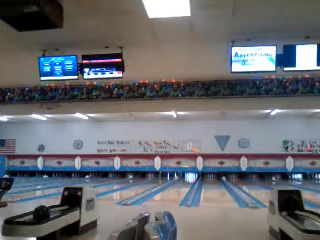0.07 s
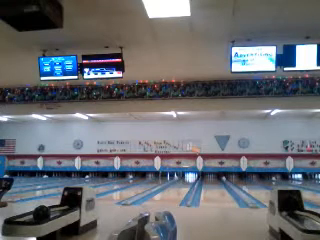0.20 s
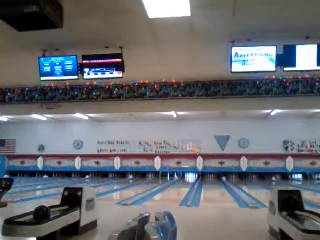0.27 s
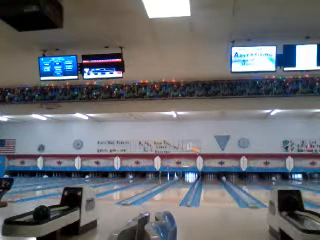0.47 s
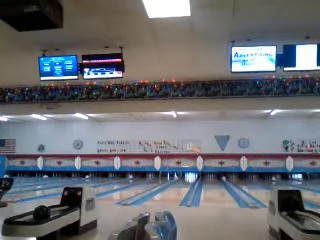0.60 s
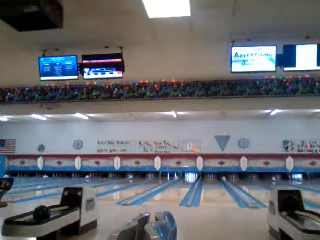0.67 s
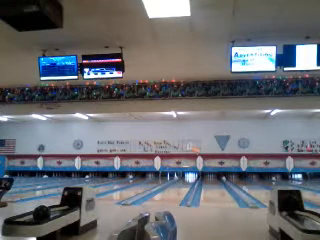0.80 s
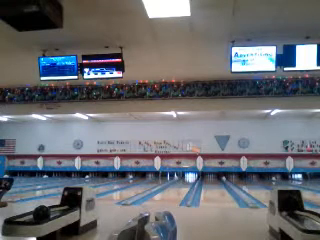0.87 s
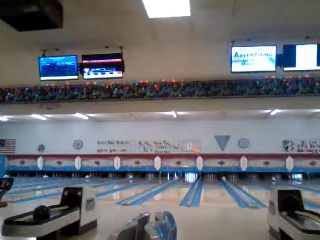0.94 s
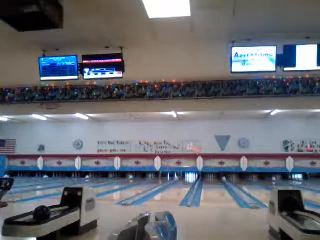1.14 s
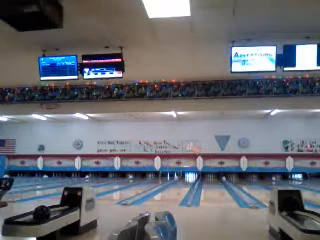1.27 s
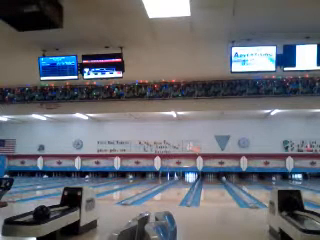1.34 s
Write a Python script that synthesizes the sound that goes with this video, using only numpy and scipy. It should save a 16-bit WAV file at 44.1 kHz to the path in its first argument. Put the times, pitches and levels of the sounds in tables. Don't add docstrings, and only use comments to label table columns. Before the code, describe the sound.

A loud bowling strike cracks out, then pins clack, knock and thud down in a hall

```python
import sys
import numpy as np
from scipy import signal
from scipy.fft import rfft, irfft, next_fast_len
from scipy.io import wavfile
from scipy.ndimage import uniform_filter1d, minimum_filter1d, map_coordinates

SR = 44100
rng = np.random.default_rng(int(sys.argv[2]) if len(sys.argv) > 2 else 0)


def store_pcm(level_fs):
    pcm = np.round(np.clip(level_fs, -1, 1) * 32767).astype(np.int16)
    wavfile.write(sys.argv[1], SR, np.atleast_2d(pcm).T)


def voltage_ratio(decibels):
    exponent = np.asarray(decibels, float) / 20
    return 10 ** exponent


N = 63945

# f/Hz, level/dB
BAND = [(5, -39), (60, -2), (3300, -1.5), (3900, -12.5), (4300, -18.5), (4800, -70), (7000, -120)]


def unit(x):
    return x / np.sqrt(np.mean(x ** 2) + 1e-20)


def along(points, hz):
    f, v = np.transpose(points)
    return np.interp(np.log(hz + 1), np.log(f + 1), v)


def filtered(x, response):
    m = next_fast_len(N + SR // 2)
    hz = np.fft.rfftfreq(m, 1 / SR)
    return irfft(rfft(x, m) * response(hz), m)[..., :N]


def causal(points):
    def response(hz):
        cepstrum = irfft(np.log(voltage_ratio(along(points, hz))))
        cepstrum[1:len(hz) - 1] *= 2
        cepstrum[len(hz):] = 0
        return np.exp(rfft(cepstrum))
    return response


def wobble(rate):
    knots = rng.standard_normal(int(N * rate / SR) + 4)
    return map_coordinates(knots, [np.arange(N) * rate / SR])


def burst(hz, life_s):
    t = np.arange(SR // 10) / SR
    swell = np.e * t / life_s * np.exp(-t / life_s)
    return swell * np.sin(2 * np.pi * hz * t)


def rush():
    # f/Hz, level/dB per Hz
    rush_colour = [(15, -61), (25, -20), (147, -16), (384, 5), (1070, -7.5), (1140, -10.5), (1520, -14.5),
                   (1990, -17.5), (3650, -30.5), (4740, -64.5), (8030, -120)]
    rush_db = -37
    z = signal.stft(rng.standard_normal(N + SR // 4), nperseg=512)[2]
    patches = uniform_filter1d(rng.standard_normal(z.shape), 4, 0)
    patches = uniform_filter1d(patches, 6, 1)
    noise = signal.istft(z * voltage_ratio(2 * unit(patches)), nperseg=512)[1][:N]

    def colour(hz):
        return voltage_ratio(along(rush_colour, hz) - np.maximum(along(BAND, hz), -12))
    return voltage_ratio(rush_db) * unit(filtered(noise, colour))


def knocks():
    # t/s, peak level/dB, f/Hz, life/cycles
    wood_knocks = [(0.101, -28.5, 384.6, 0.69), (0.223, 2, 658, 0.91), (0.23, -13.5, 730, 1.7),
                   (0.275, -9.5, 783, 1.3), (0.284, -8.5, 691, 1.9), (0.313, -7, 735, 1.1),
                   (0.337, -12.5, 618.5, 0.86), (0.388, -18, 370, 1.3), (0.406, -3.5, 657, 1.5),
                   (0.442, -25.5, 622, 2.8), (0.474, -14, 303.6, 1), (0.545, -14.5, 417, 2.7),
                   (0.606, -18.5, 332, 1.8), (0.632, -28.5, 415, 0.81), (0.653, -14.5, 500, 2.4),
                   (0.675, -13.5, 519, 1.1), (0.715, -14.5, 680, 1), (0.756, -18.5, 349, 1.33),
                   (0.795, -16.5, 379, 1.1), (0.842, -10.5, 388, 1.14), (0.914, -12.5, 381, 0.78),
                   (0.96, -12.5, 516, 0.79), (0.974, -17, 540, 2.3), (1.011, -23, 740, 1.4),
                   (1.036, -35, 428, 1.3), (1.061, -20.5, 504, 1.7), (1.084, -22, 258.7, 1.5),
                   (1.116, -25, 242.6, 1.5), (1.15, -14, 633, 1.37)]
    # t/s, peak level/dB, f/Hz, life/cycles
    more_knocks = [
        (.2313, -10, 710, 0.92),
        (.330, -17.5, 373.5, 2.64),
        (.4078, -8, 457.5, 1.15),
        (.420, -16, 486, 1.8),
        (.464, -14.5, 561, 2.8),
        (.484, -21, 289.6, 2.4),
        (.925, -18, 633, 1.2),
        (.945, -19.5, 505, 2.1),
        (.985, -20, 620, 1.1),
        (1.158, -17.5, 706, 1.83),
    ]
    # t/s, peak level/dB, f/Hz
    pings = [
        (0.2537, -20, 1490),
        (0.3137, -24, 1584),
        (0.4674, -19.5, 1430),
        (0.5208, -31, 1750),
        (0.6794, -29, 1650),
        (0.6933, -30.5, 1828),
        (0.705, -31.5, 1904),
        (0.7597, -33, 2110),
        (1.0494, -48.5, 1606),
    ]
    # f/Hz, level/dB
    crack_colour = [(300, -10.5), (1500, 7.5), (2300, -3.5), (2800, -13.5), (3400, -3), (4200, -6)]
    knock_db, lag_s = -0.5, 0.0001
    under, under_db = 0.686, -9
    crack_db, crack_s, crack_grows = -18.5, 0.009, 1.2
    lead_s, lead_db = 0.0029, -24.5
    ping_db, ping_s = -1.5, 0.0016

    x, cracks = np.zeros(N + SR), np.zeros(N + SR)
    t = np.arange(SR // 10) / SR
    s, db, hz, life = wood_knocks[1]
    lead_in = [(s - lead_s, db + lead_db, hz, life)]
    for s, db, hz, life in lead_in + list(wood_knocks) + list(more_knocks):
        at = round((s + lag_s) * SR)
        life_s = max(life, 0.2) / hz
        modes = burst(hz, life_s) + voltage_ratio(under_db) * burst(under * hz, life_s / under)
        x[at:][:len(t)] += voltage_ratio(db + knock_db) * modes
        crack = np.exp(-t / crack_s) * rng.standard_normal(len(t))
        cracks[at:][:len(t)] += voltage_ratio(crack_grows * db + crack_db) * crack
    for s, db, hz in pings:
        x[round(s * SR):][:len(t)] += voltage_ratio(db + ping_db) * burst(hz, ping_s)
    return x[:N] + filtered(cracks[:N], causal(crack_colour))


def pin_body(f):
    # f/Hz, width/Hz, level/dB
    pin_modes = [(678, 45, -10), (797, 30, -12), (985, 20, -9), (1016, 20, -10), (1100, 40, -12),
                 (1167, 18, -1), (1211, 14, -1), (2000, 400, -26), (3350, 300, -30)]
    total = 0
    for k, (centre, width, db) in enumerate(pin_modes):
        damping = 1j * f * width
        total = total + (-1) ** k * voltage_ratio(db) * damping / (centre * centre - f * f + damping)
    return total


def thuds(count):
    centre_hz, spread_octaves = 400.8, 0.45
    life_cycles, spread_db = 2.45, 1.5
    rows, t = rng.standard_normal((count, 2)), np.arange(SR // 20)
    start = rng.integers(0, N, (count, 1))
    hz = centre_hz * 2 ** (spread_octaves * np.clip(rows[:, :1], -1, 2))
    turns = hz * t / SR
    swell = turns * np.exp(-turns / life_cycles)
    bumps = voltage_ratio(spread_db * rows[:, 1:]) * swell * np.sin(2 * np.pi * turns)
    return start, (start + t).ravel(), bumps


def scatter(count, spread_db):
    rows, x = rng.random((count, 3)), np.zeros(N)
    size = voltage_ratio(-spread_db * np.log(rows[:, 2] + 0.02))
    np.add.at(x, (rows[:, 0] * N).astype(int), np.sign(rows[:, 1] - 0.5) * size)
    return x


def tumble():
    # t/s, activity level/dB, pin-on-pin share level/dB
    activity = [
        (.222, -27, 2.5),
        (.30, -30.5, 4),
        (.42, -24.5, -1),
        (.51, -29.5, 1.5),
        (.68, -24.5, -2.5),
        (.88, -30.5, -4),
        (.96, -27, -12),
        (1.1, -34.5, -8.5),
        (1.4, -46.5, -15),
    ]
    # f/Hz, level/dB per Hz
    deck_colour = [(35, -46), (60, -7.5), (128, -7.5), (391, 5), (689, 9), (923, 1.5), (1170, -10.5),
                   (1350, -7.5), (3650, -31.5), (4740, -60), (8030, -120)]
    thud_db, rattle_db, tick_db = -5.5, -3, -4.5
    deck_build_s = 0.088

    s, db, share_db = np.transpose(activity)
    now = np.arange(N) / SR
    fade_db = -120 * np.clip(now - s[-1], 0, None) + 1.5 * wobble(12)
    level = voltage_ratio(np.interp(now, s, db) + fade_db) * (now > s[0])

    start, where, bumps = thuds(count=260)
    steady = np.bincount(where, bumps.ravel())
    deck = np.bincount(where, (level[start] * bumps).ravel())[:N] / steady.std()
    deck = deck * np.clip((now - s[0]) / deck_build_s, 0, 1)

    fine = scatter(count=3000, spread_db=2)
    uneven = level * voltage_ratio(5.1 * wobble(35))
    rattle = filtered(uneven * fine, causal(deck_colour)) / filtered(fine, causal(deck_colour)).std()

    ticks = scatter(count=600, spread_db=3)
    contact = level * voltage_ratio(np.interp(now, s, share_db))
    pins = filtered(contact * ticks, pin_body) / filtered(ticks, pin_body).std()
    return voltage_ratio(thud_db) * deck + voltage_ratio(rattle_db) * rattle + voltage_ratio(tick_db) * pins


def clacks():
    # t/s, peak level/dB, f/Hz
    pin_clacks = [(0.2363, -8.5, 988), (0.2502, -9.5, 1064), (0.2631, -14.5, 1100), (0.2742, -16.5, 1020),
                  (0.292, -15.5, 935), (0.3087, -8.5, 1184), (0.3107, -10.5, 988), (0.3289, -4, 1177),
                  (0.3406, -11, 1154), (0.3558, -16, 1150), (0.373, -14.5, 1184), (0.4008, -9.5, 1232),
                  (0.4185, -11, 1108), (0.4322, -9, 1174), (0.4551, -16.5, 1160), (0.4694, -17.5, 1128),
                  (0.5087, -18, 1195), (0.5286, -23, 1190), (0.5444, -13.5, 1225), (0.5841, -30, 1190),
                  (0.6008, -21.5, 1200), (0.6532, -20.5, 1173), (0.6765, -19, 1226), (0.7133, -27.5, 1100),
                  (0.759, -23.5, 1190), (0.7841, -20.5, 1192), (0.8085, -22.5, 1210), (0.959, -22, 906),
                  (1.193, -24.5, 1060)]
    clack_db, clack_s, ring_db = -4, 0.0036, -24
    x, blows = np.zeros(N + SR), np.zeros(N)
    for s, db, hz in pin_clacks:
        at = round(s * SR)
        x[at:][:SR // 10] += voltage_ratio(db + clack_db) * burst(hz, clack_s)
        blows[at] = voltage_ratio(db + ring_db)
    one_ring = np.abs(filtered(np.arange(N) == 0, pin_body)).max()
    return x[:N] + filtered(blows, pin_body) / one_ring


def hall(x):
    # delay t/s, level/dB
    walls = [
        (.0085, -15),
        (0.015, -17.5),
        (0.022, -15),
        (.029, -34.5),
    ]
    # f/Hz, t60 t/s
    decay_times = [(150, 1), (500, 0.6), (1200, 0.97), (3500, 1)]
    # f/Hz, level/dB
    tail_colour = [(100, 2.5), (1300, -1), (2200, -1.5), (3500, -7.5)]
    wet_db = -8
    hz, t, z = signal.stft(rng.standard_normal(SR), SR, nperseg=256)
    decay_db = -60 * t / along(decay_times, hz)[:, None]
    tail = signal.istft(z * voltage_ratio(along(tail_colour, hz)[:, None] + decay_db), SR, nperseg=256)[1]
    tail = voltage_ratio(wet_db) * tail / np.linalg.norm(tail)
    answer = np.pad(tail, (SR // 40, 0))
    for s, db in walls:
        answer[round(s * SR)] += voltage_ratio(db)
    return signal.fftconvolve(x, answer)[:N]


def scene():
    # f/Hz, level/dB
    radiation = [(40, -24.5), (150, -4), (260, -1), (5000, 2)]
    pins = filtered(knocks(), causal(radiation)) + tumble() + clacks()
    return (rush() + pins + hall(pins))[None]


def top_cut(x):
    return signal.sosfilt(signal.butter(12, 16500, fs=SR, output="sos"), x)


def record(dry):
    held, wakes_s, react_s = 0.66, 0.235, 0.006
    ceiling, fade_s = 0.712, 0.0014
    narrow = filtered(dry, causal(BAND))
    span = round(react_s * SR)
    awake = np.arange(N) > wakes_s * SR
    need = np.where(awake, np.minimum(1, held / (np.abs(narrow) + 1e-9)), 1)
    gain = minimum_filter1d(need, 2 * span + 1)
    gain = uniform_filter1d(uniform_filter1d(gain, span), span)
    fade = np.clip((N - np.arange(N)) / (fade_s * SR), 0, 1)
    mix = np.clip(gain * narrow, -ceiling, ceiling) * fade
    return top_cut(mix)


dry = scene()
out = record(dry)
store_pcm(out)
```